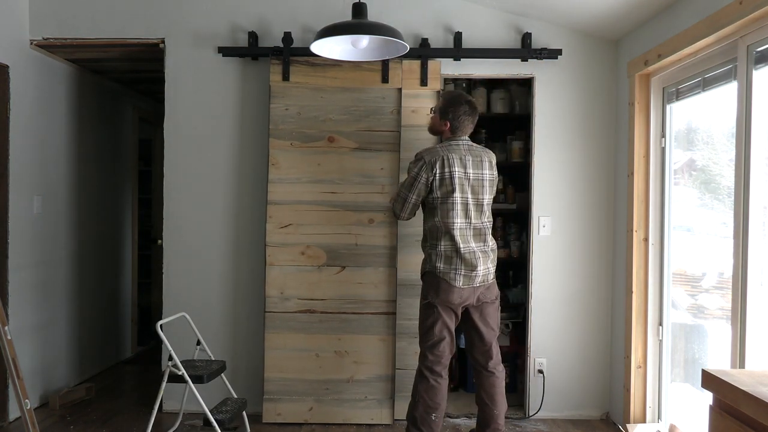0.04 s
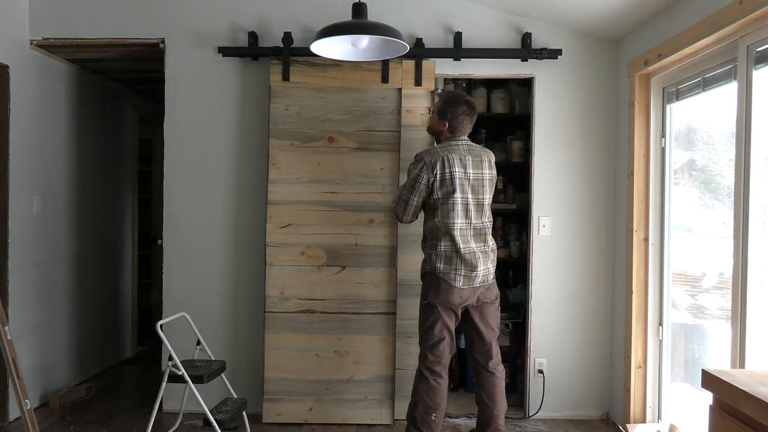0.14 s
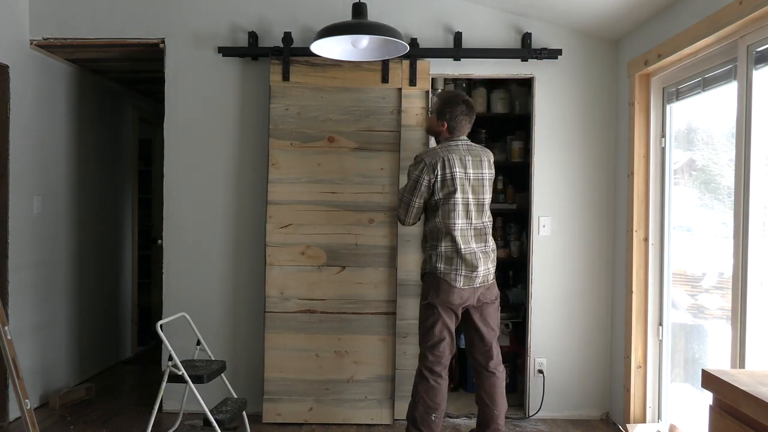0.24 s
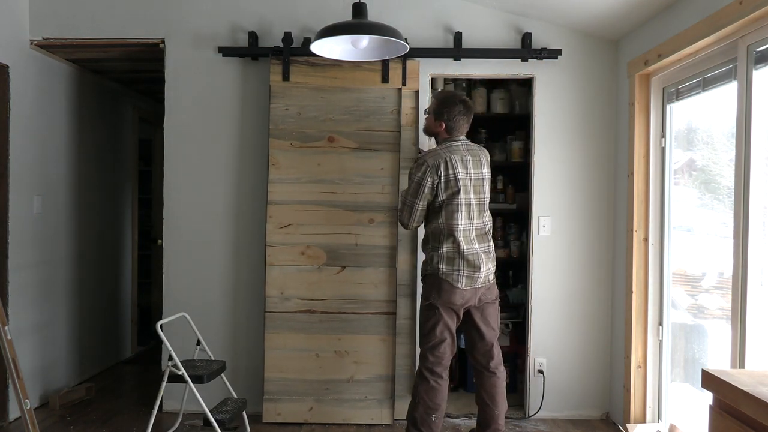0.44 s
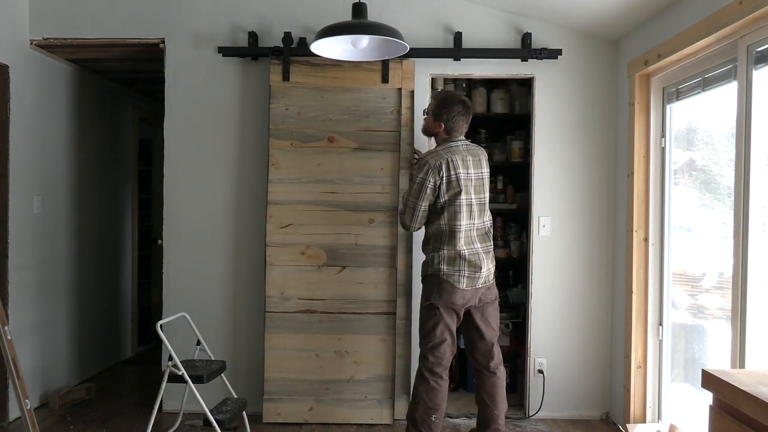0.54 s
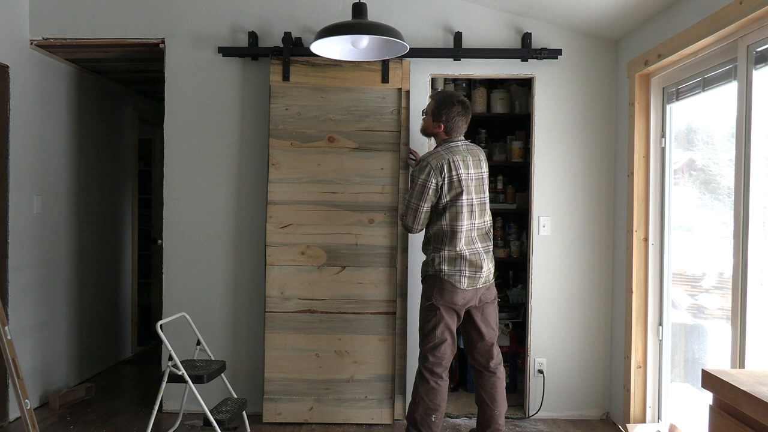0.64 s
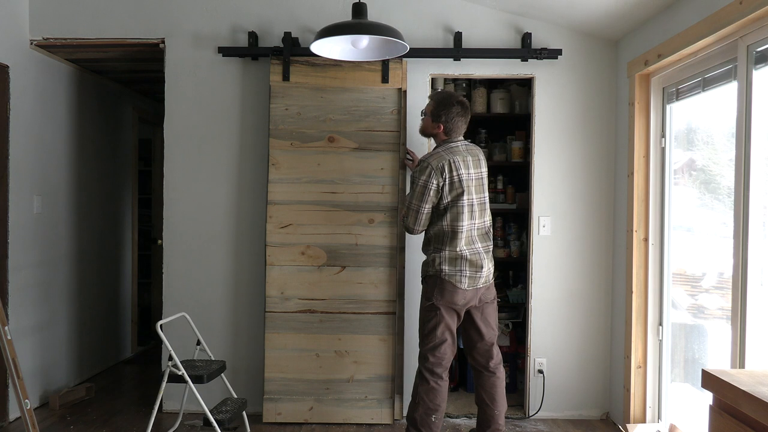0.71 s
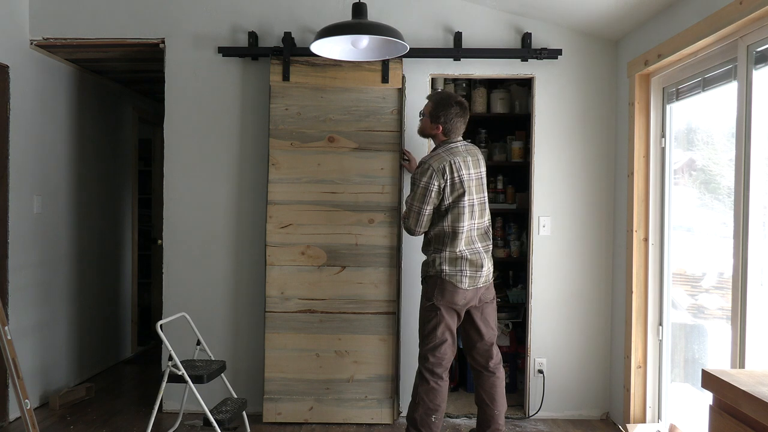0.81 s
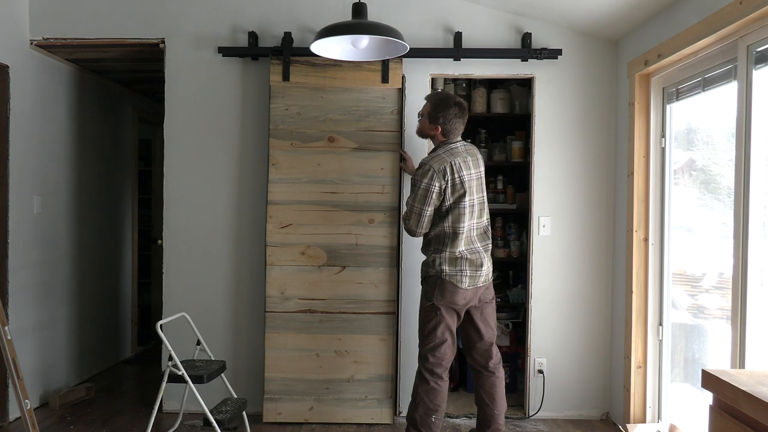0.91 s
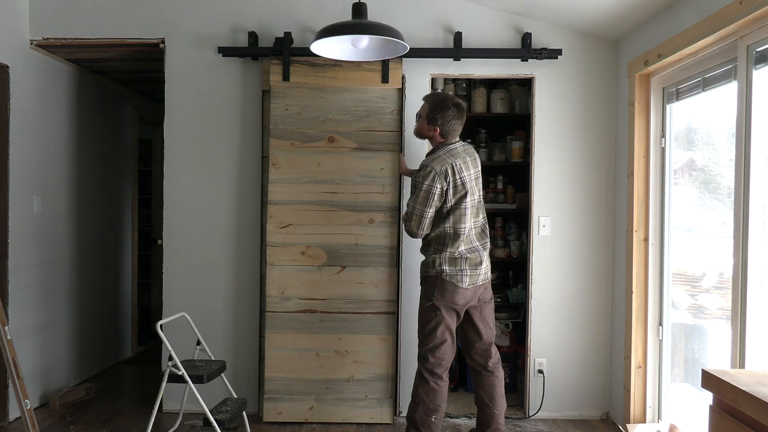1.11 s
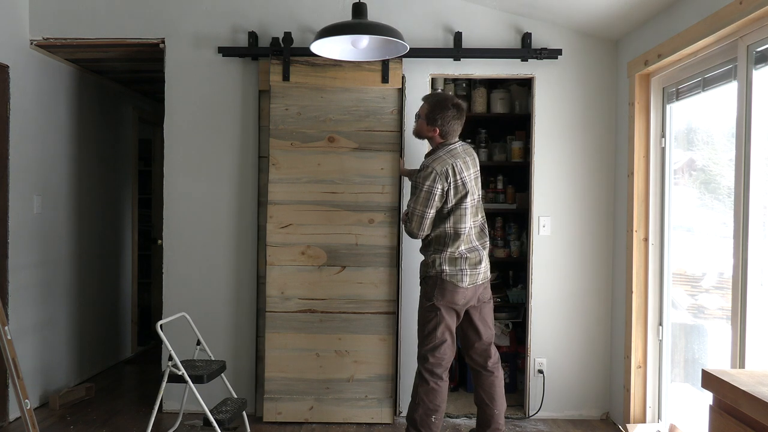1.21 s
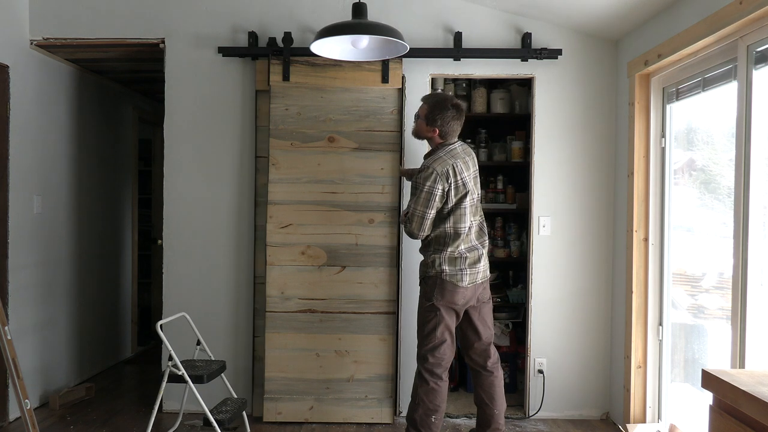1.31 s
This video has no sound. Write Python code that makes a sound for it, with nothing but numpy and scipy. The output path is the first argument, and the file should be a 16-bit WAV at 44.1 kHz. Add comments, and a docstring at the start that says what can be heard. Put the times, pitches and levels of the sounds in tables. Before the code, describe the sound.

Heard from nearby in a quiet room, a hanging plank door slides and strikes its stop: a sharp clack, a quick chatter and a dull wooden thud. Soft wheel bumps and scuffs follow, dying away.

```python
"""A quiet room, one microphone, near enough to a plank door to hear more door than walls.
The door rolls along a steel rail, its wheels rumbling and faintly singing. Its hanger knocks against
a stop: a hard clack, a few quick after-contacts, the low thud and ring of the planks. The panel sways
and the wheels bump and scuff on, fading toward the room tone."""
import sys
import numpy as np
from scipy import signal
from scipy.fft import rfft, irfft, next_fast_len
from scipy.io import wavfile
from scipy.ndimage import map_coordinates

SR = 44100
rng = np.random.default_rng(int(sys.argv[2]) if len(sys.argv) > 2 else 0)


def materialize(psi):
    """Save the field psi as 16-bit PCM at rate SR to the path in sys.argv[1].

    A 1-D psi becomes a single channel; in a 2-D psi each row is a channel.
    """
    bounded = np.clip(np.atleast_2d(psi).T, -1, 1)
    quanta = np.round(bounded * 32767).astype(np.int16)
    wavfile.write(sys.argv[1], SR, quanta)


N = 59535
T = np.arange(N) / SR

# room tone: freq_hz, relative_db
ROOM_TONE_COLOUR = [(30, 22), (100, 23), (400, 9), (1000, 8), (2000, 0), (3100, -3.5), (3900, 2.5),
                    (4800, -5.5), (8000, -6), (11000, -10), (15500, -11.5)]
# reverberation of the room: freq_hz, t60_s
ROOM_DECAY = [(80, 0.95), (300, 0.46), (800, 0.6), (1500, 0.54), (3000, 0.45), (5000, .45), (10000, .3)]
# rumble of the wheels: time_s, level_db
ROLL_LEVEL = [(0, -38), (.2, -35.5), (.42, -31.5), (.6, -38.5), (.72, -39.5), (.84, -41.5), (.97, -41.5),
              (1.1, -42.5), (1.35, -44.5)]
# wheels heard through the door: freq_hz, relative_db
WHEEL_COLOUR = [(30, -5.5), (70, 0), (110, -4.5), (200, -6), (255, 2), (305, -5.5), (370, -2), (500, -4.5),
                (610, -12.5), (850, -13.5), (1100, -21), (1300, -23.5), (1700, -33.5), (3000, -37),
                (6000, -65)]
# soft bumps on the rail: start_s, relative_db
RAIL_BUMPS = [(0.398, -24.5), (0.456, -31.5), (0.548, -28.5), (0.779, -32.5), (0.843, -38), (1.063, -39.5)]
# modes of planks and hanger: pitch_hz, relative_db, t60_s
DOOR_MODES = [(174.55, -12.5, 0.37), (216.7, -11.5, 0.35), (256, -8.5, 0.67), (281.7, -0.5, .24),
              (340, -10.5, 0.63), (407, -2, 0.31), (444.5, 2.5, 0.2), (735, 0.5, 0.24), (768, -5.5, 0.19),
              (858.4, -6.5, 0.23), (1002, -6.5, .22), (1166, -11, 0.21), (1281, -5, .27),
              (1439, -5.5, 0.14), (1574, -3.5, .2), (1897, -8, .22), (2483, -8.5, 0.17)]
# sway of the panel: time_s, level_db
SWAY_LEVEL = [(0, -33), (.2, -44), (.35, -39), (.5, -33.5), (.66, -37), (.8, -47.5), (1, -50.5),
              (1.12, -41.5), (1.35, -48.5)]
# a wheel sings: start_s, length_s, pitch_hz, level_db
WHEEL_WHINES = [(0, .2, 357, -42), (0.757, 0.092, 359.2, -39.5), (0.804, 0.16, 660, -49.5),
                (0.99, 0.13, 662, -51)]
# sliding hiss: time_s, level_db
HISS_LEVEL = [(0, -70), (.1, -83), (.36, -82), (.43, -67.5), (.5, -78), (.61, -66.5), (.8, -77), (.95, -78),
              (1.06, -67), (1.18, -72), (1.35, -71.5)]
# sliding hiss: freq_hz, relative_db
HISS_COLOUR = [(500, -29), (3000, -7), (5500, 1.5), (8500, -3), (11000, -11), (15500, -16)]
# scuffs of the wheels: start_s, level_db
WHEEL_SCUFFS = [(0.55, -38.5), (0.655, -52), (0.76, -52.5), (0.845, -46), (1.04, -51.5)]
# one scuff: freq_hz, relative_db
SCUFF_COLOUR = [(200, -23), (500, 5), (660, 1), (860, -8), (1100, -6), (1700, -15), (2300, -16),
                (4000, -32), (12000, -41)]
# hanger meeting the stop: start_s, clack_db, thud_db
STOP_CONTACTS = [(0.2245, -12.5, -22.5), (0.23, -16.5, -17), (0.2366, -17, -23.5), (0.2450, -35, -10.5),
                 (0.2777, -30, -12.5)]
# hard contact: freq_hz, relative_db
CLACK_COLOUR = [(100, -25), (600, -14), (1000, -5), (1500, -.5), (2100, -4), (2700, -4.5), (3100, -11),
                (3450, -15), (4000, -19), (4600, -28), (7000, -39), (12000, -56)]
# dull thud of the planks: freq_hz, relative_db
THUD_COLOUR = [(30, -34), (65, -6.5), (105, -10.5), (170, -4.5), (270, -3), (350, -4.5), (440, 1),
               (600, -13), (800, -7), (1500, -21.5), (4000, -72)]


def amp(db):
    """Decibels to gain."""
    return 10 ** (np.asarray(db) / 20)


def along(points, hz):
    """Read (freq_hz, value) points on a log frequency axis."""
    freqs, values = np.transpose(points)
    return np.interp(np.log(hz + 1), np.log(freqs + 1), values)


def level(points):
    """Gain per sample from (time_s, level_db) points."""
    return amp(np.interp(T, *np.transpose(points)))


def noise(colour):
    """Noise of rms 1 with the given spectrum and random phases."""
    hz = np.fft.rfftfreq(N, 1 / SR)
    phases = np.exp(2j * np.pi * rng.random(len(hz)))
    x = irfft(amp(along(colour, hz)) * phases, N)
    return x / x.std()


def struck(start, attack_s, t60_s):
    """Envelope of a blow: quick rise, exponential fall."""
    age = np.maximum(T - start, 0)
    return (1 - np.exp(-age / attack_s)) * amp(-60 * age / t60_s)


def wavering(hz, waver_hz, turns_per_s=29):
    """A sine of rms 1 whose pitch wanders."""
    drift = map_coordinates(rng.standard_normal(256), [T * turns_per_s], mode="mirror")
    cycles = np.cumsum(hz + waver_hz * drift) / SR
    return np.sqrt(2) * np.sin(2 * np.pi * (cycles + rng.random()))


def room_tone():
    """The steady, low background of the room."""
    return amp(-53.5) * noise(ROOM_TONE_COLOUR)


def rolling():
    """The wheels rumble through the door; their bumps on the rail ring its low modes."""
    rumble = level(ROLL_LEVEL) * noise(WHEEL_COLOUR)
    bump_envelope = sum(amp(db) * struck(start, attack_s=0.011, t60_s=0.13) for start, db in RAIL_BUMPS)
    bumps = amp(-5.5) * bump_envelope * noise(WHEEL_COLOUR)
    low_ring = sum(amp(db) * door_modes(start, soft_hz=360) for start, db in RAIL_BUMPS)
    return rumble + bumps + amp(3) * low_ring


def sway():
    """The hanging panel flexes at the bottom of hearing."""
    return level(SWAY_LEVEL) * wavering(hz=29.7, waver_hz=2.75)


def whine():
    """The wheels sing faintly in short tones that swell and fade."""
    tones = np.zeros(N)
    for start, length, hz, db in WHEEL_WHINES:
        swell = np.sin(np.pi * np.clip((T - start) / length, 0, 1))
        tones += amp(db) * swell * wavering(hz, waver_hz=4)
    return tones


def sliding():
    """A faint hiss and light scuffs of the wheels as the door moves."""
    hiss = level(HISS_LEVEL) * noise(HISS_COLOUR)
    scuffs = sum(amp(db) * struck(start, attack_s=0.0061, t60_s=0.24) for start, db in WHEEL_SCUFFS)
    return hiss + scuffs * noise(SCUFF_COLOUR)


def knock():
    """The hanger chatters on the stop: each contact is a hard clack and a dull thud."""
    clack, thud = np.zeros((2, N))
    for start, clack_db, thud_db in STOP_CONTACTS:
        clack += amp(clack_db) * noise(CLACK_COLOUR) * struck(start, attack_s=0.00077, t60_s=0.046)
        thud += amp(thud_db) * noise(THUD_COLOUR) * struck(start, attack_s=0.0011, t60_s=0.086)
    return clack + thud + amp(-3) * walls(clack) + amp(-9) * walls(thud)


def door_modes(start, soft_hz=np.inf, attack_cycles=2.6):
    """One blow sets the door's modes going; a soft one barely stirs those above soft_hz."""
    ringing = np.zeros(N)
    for hz, db, t60_s in DOOR_MODES:
        gain = amp(db + rng.normal(0, 1)) / (1 + (hz / soft_hz) ** 4)
        envelope = struck(start, attack_cycles / hz, t60_s)  # low modes build up more slowly
        ringing += gain * envelope * np.sin(2 * np.pi * (hz * T + rng.random()))
    return ringing


def ring():
    """Planks and hanger ring on from the first contact with the stop."""
    planks = door_modes(start=STOP_CONTACTS[0][0])
    return amp(-17) * (planks + amp(-13) * walls(planks))


def walls(x, build_s=0.007):
    """What the walls send back to the microphone; each frequency dies at its own speed."""
    hz, t, spectrum = signal.stft(rng.standard_normal(SR), SR, nperseg=256)
    decay = amp(-60 * t / along(ROOM_DECAY, hz)[:, None])
    tail = signal.istft(spectrum * decay, SR, nperseg=256)[1][:SR]
    tail *= 1 - np.exp(-T[:SR] / build_s)
    return signal.fftconvolve(x, tail / np.linalg.norm(tail))[:N]


def scene():
    """The door over the room tone, in mono at the microphone."""
    return (room_tone() + rolling() + sway() + whine() + sliding() + knock() + ring())[None]


def record(dry):
    """The camera keeps nothing above its band limit."""
    top_hz = 15760
    padded = next_fast_len(N + 8192)
    passband = np.fft.rfftfreq(padded, 1 / SR) < top_hz
    return irfft(rfft(dry, padded) * passband, padded)[:, :N]


dry = scene()
out = record(dry)
materialize(out)
```